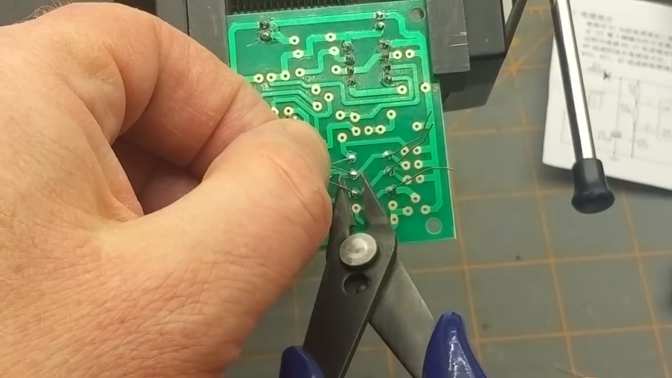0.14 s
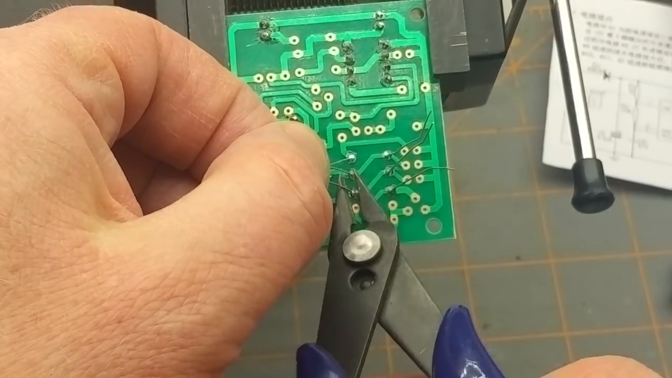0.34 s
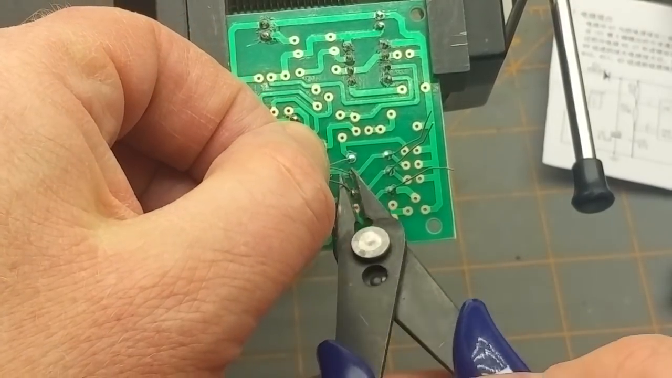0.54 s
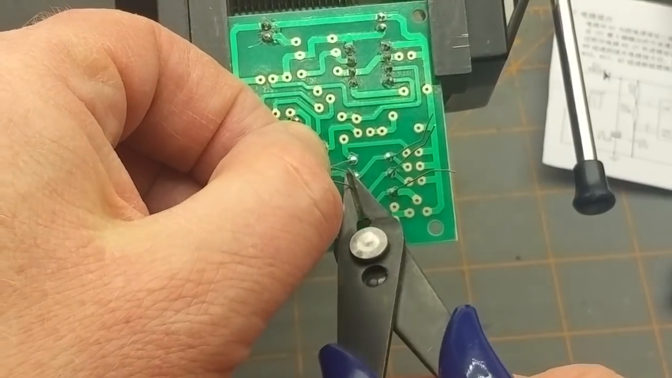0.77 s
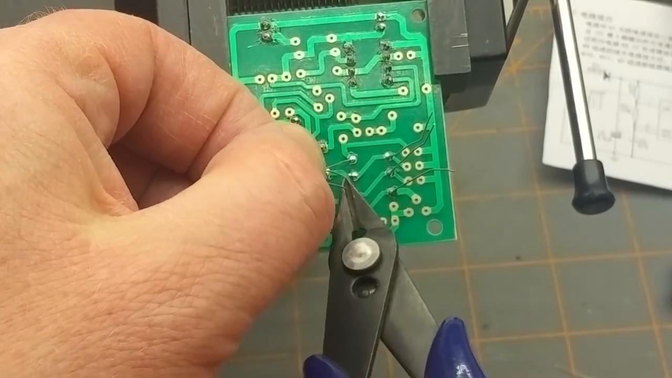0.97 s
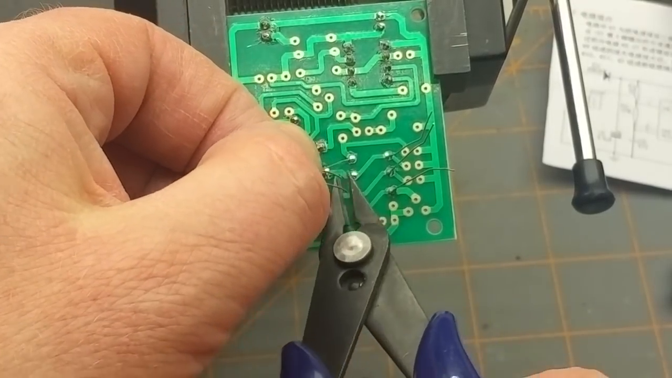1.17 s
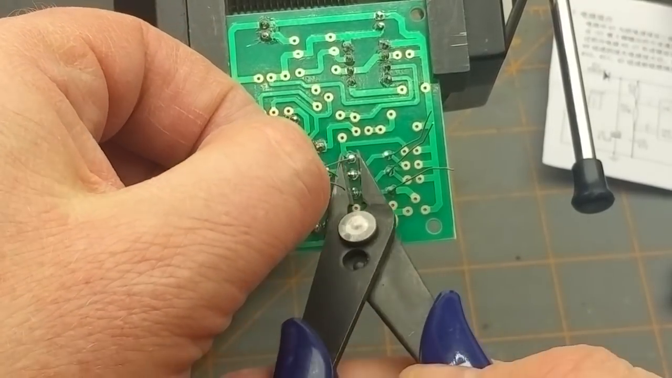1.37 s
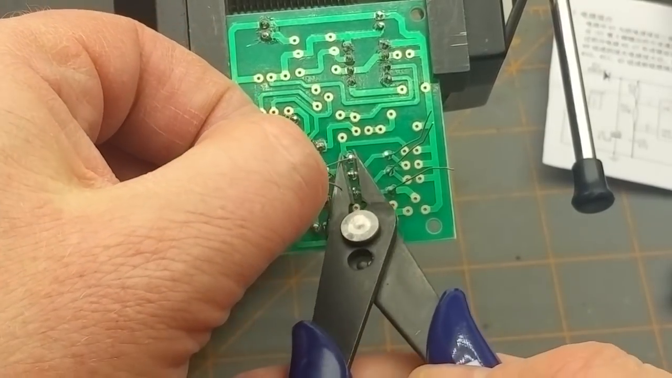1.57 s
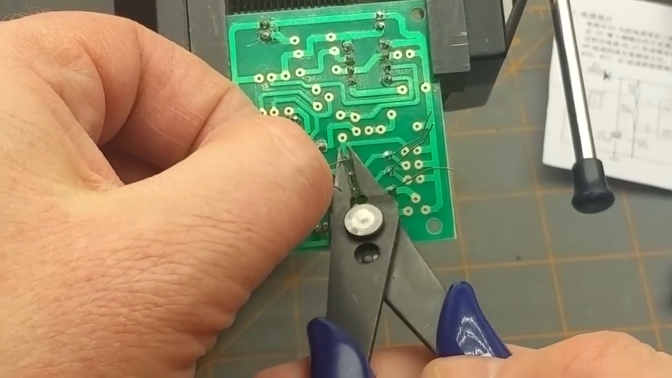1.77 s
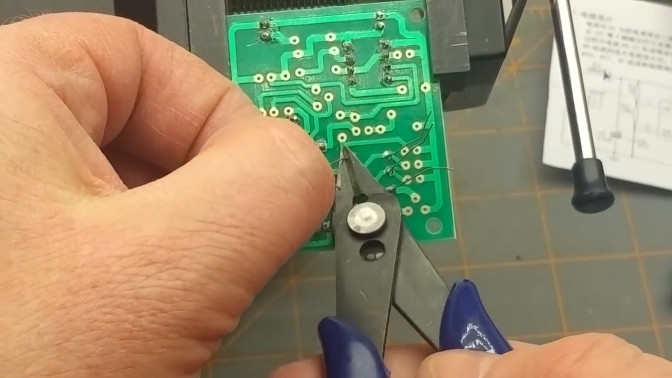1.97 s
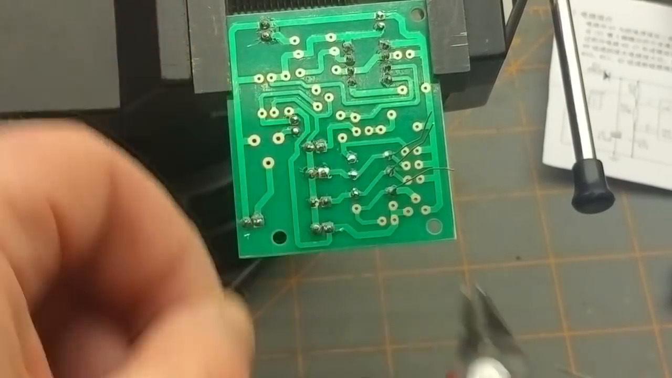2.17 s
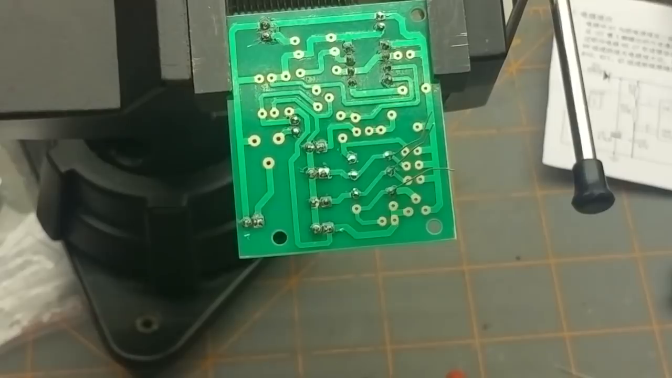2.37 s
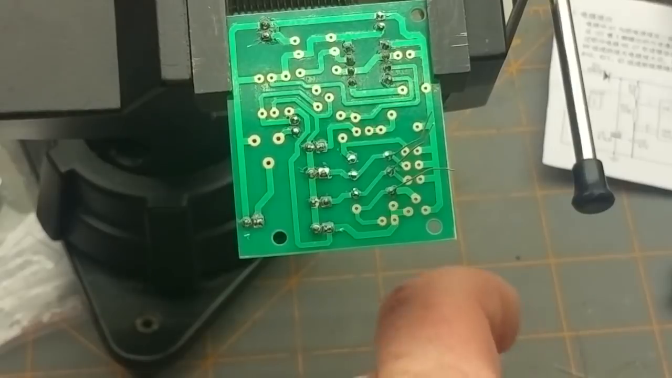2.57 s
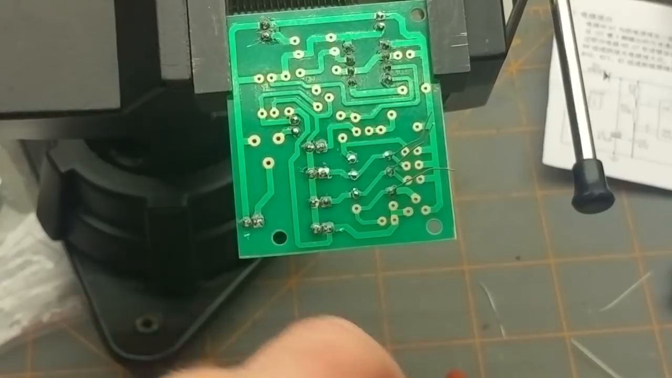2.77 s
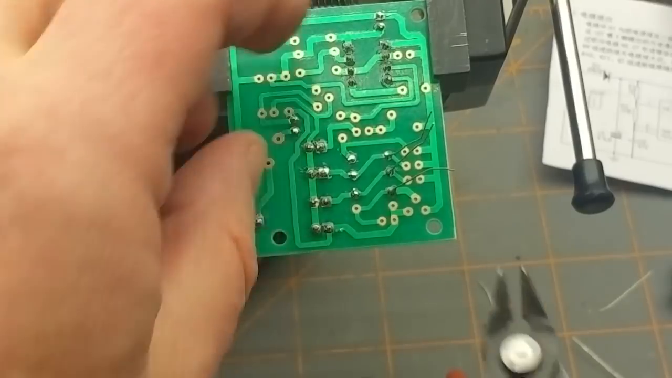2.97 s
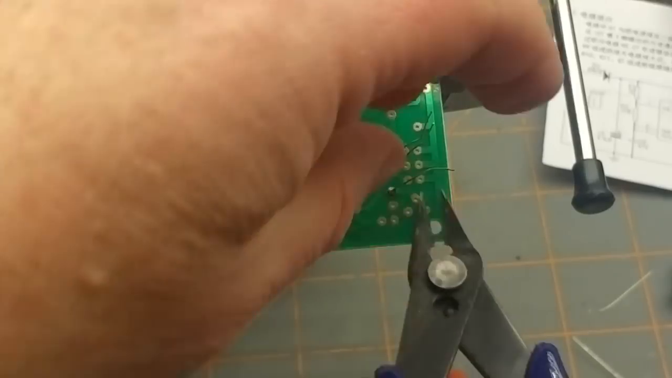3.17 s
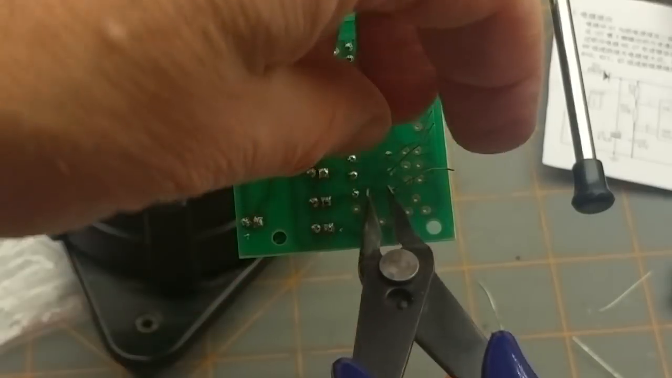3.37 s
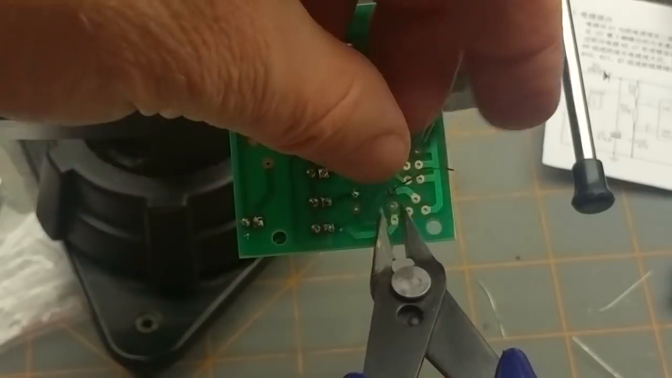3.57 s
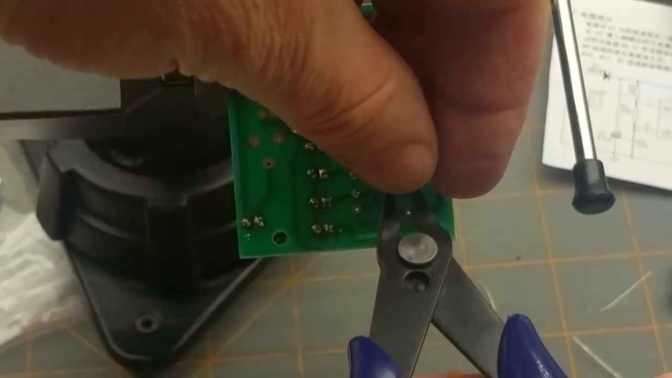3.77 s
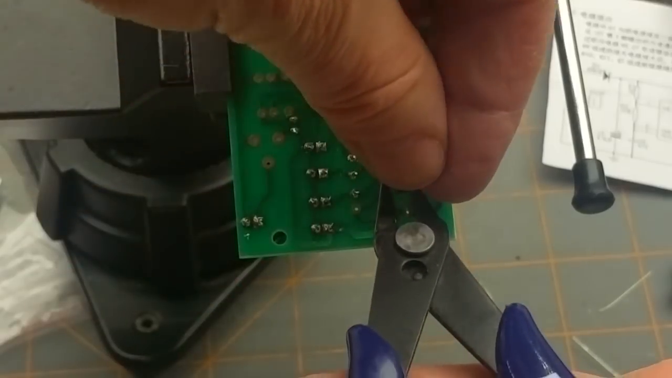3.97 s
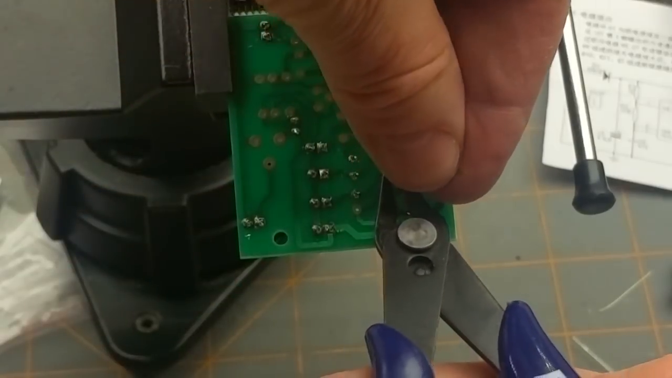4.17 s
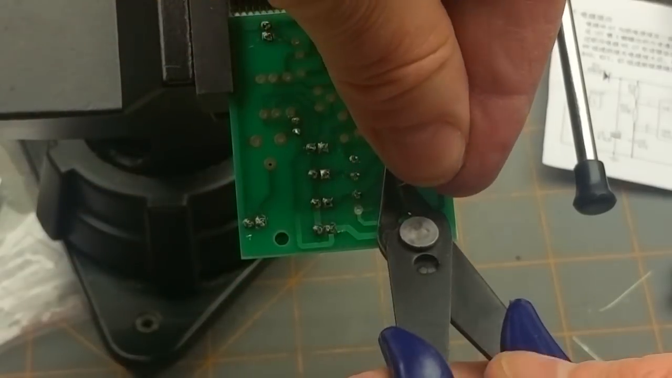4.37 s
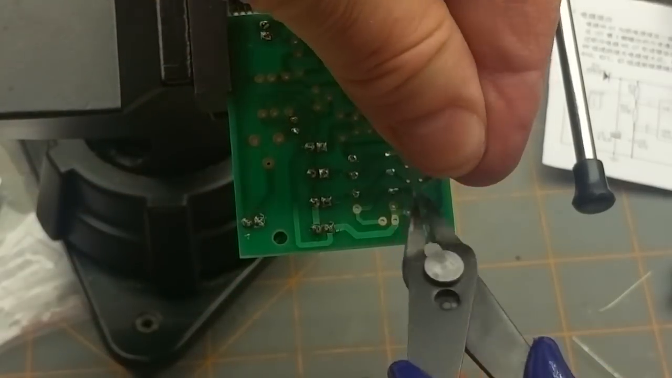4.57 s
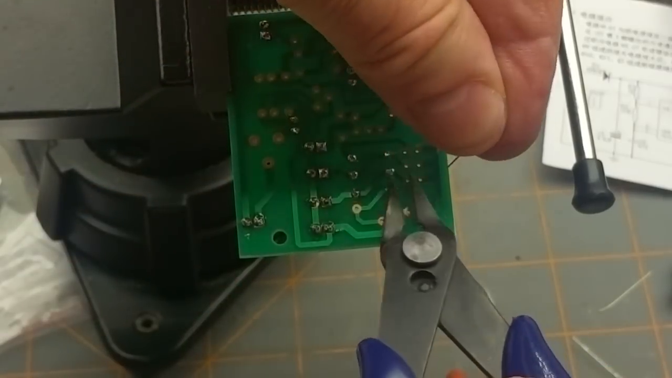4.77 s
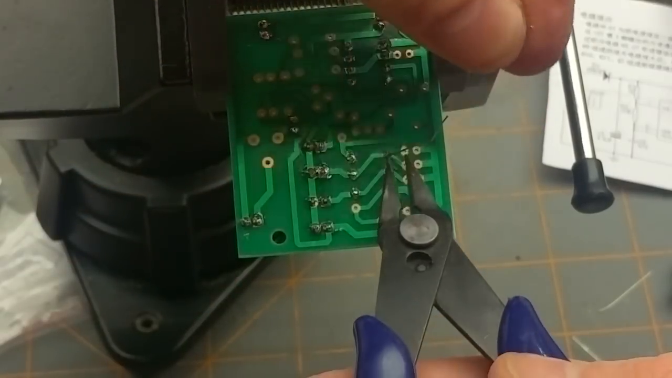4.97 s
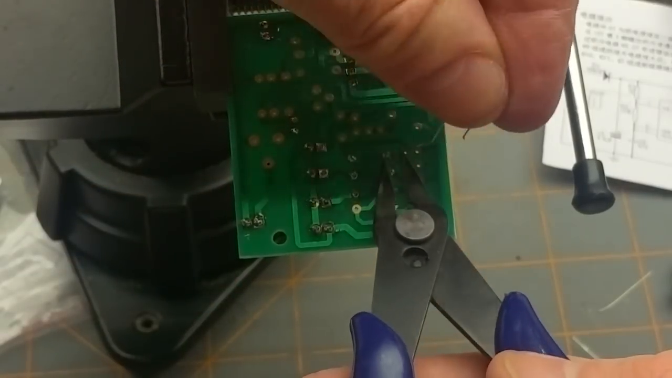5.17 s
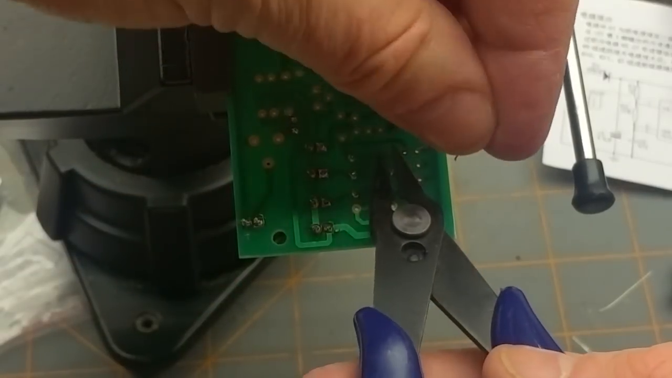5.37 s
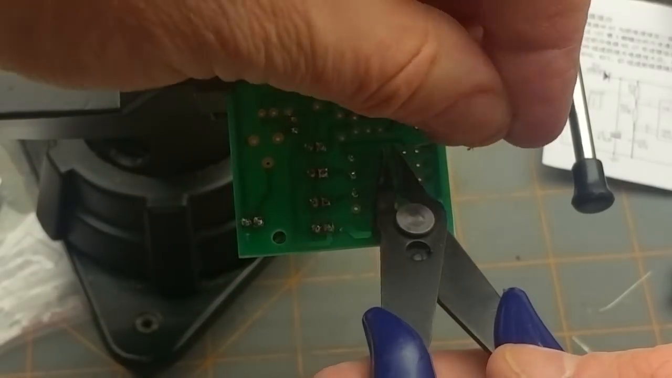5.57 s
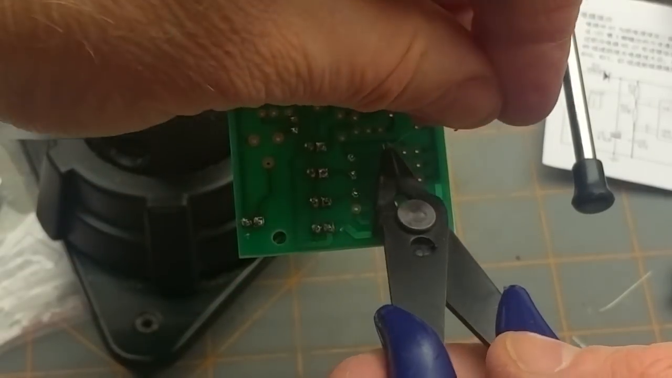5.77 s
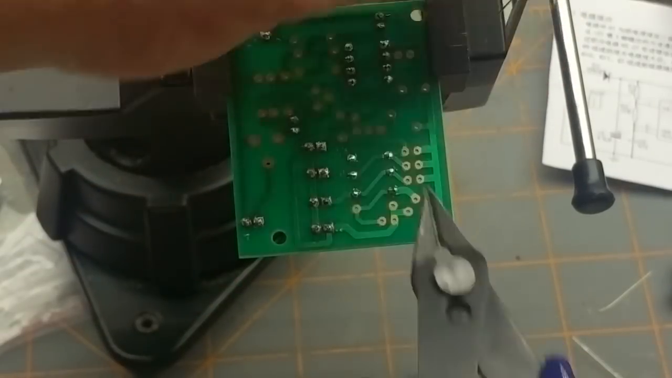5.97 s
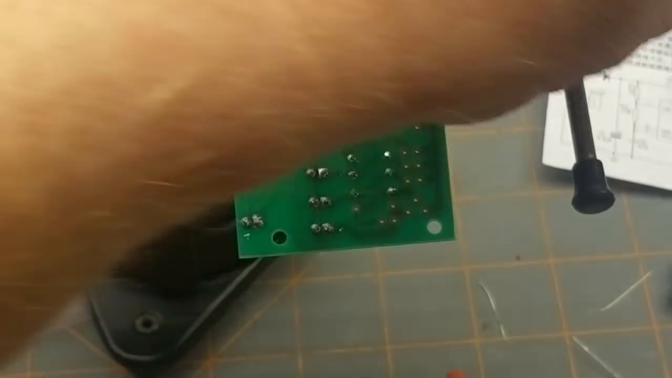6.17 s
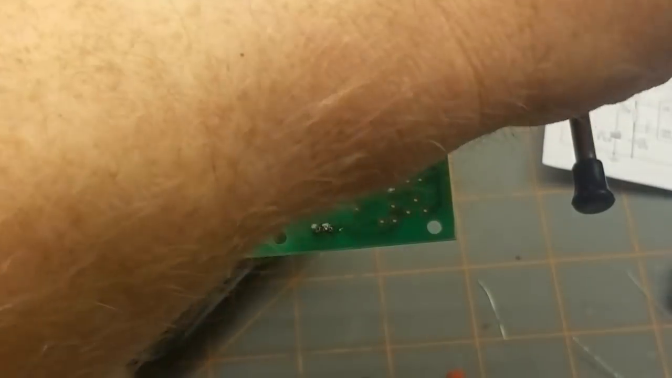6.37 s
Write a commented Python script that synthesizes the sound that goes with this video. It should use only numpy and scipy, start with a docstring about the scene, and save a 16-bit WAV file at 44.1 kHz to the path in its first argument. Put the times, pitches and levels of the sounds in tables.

```python
"""Flush cutters snip wire leads on a circuit board held in a bench vise, close to the microphone in a small room.
Each cut is a noise burst through the board's resonances, over decaying sines for the thump of vise and bench.
Between cuts the jaws tick (filtered bursts), nudge the board and squeak on the leads (wavering tone and grit);
with some cuts, and at times between them, the steel rings (decaying modes). Offcuts patter on the mat in shrinking
bounces. Behind lie hiss (shaped noise), hum (steady sines) and a faint falling drone like a distant engine."""
import sys
import numpy as np
from scipy import signal
from scipy.fft import rfft, irfft, next_fast_len
from scipy.io import wavfile
from scipy.ndimage import map_coordinates

SR = 44100
rng = np.random.default_rng(int(sys.argv[2]) if len(sys.argv) > 2 else 0)


def wav_record(signal):
    """Record a signal, one row per channel, as 16-bit PCM in the file named by sys.argv[1]."""
    frames = np.transpose(np.atleast_2d(signal))
    bounded = np.clip(frames, -1, 1)
    # unit amplitude maps onto the largest positive 16-bit level
    quanta = np.round(bounded * 32767).astype(np.int16)
    wavfile.write(sys.argv[1], SR, quanta)


N = 283637
SIZE = 16384  # samples in one short sound
AGE = np.arange(SIZE) / SR  # seconds since a short sound began
GRID = np.fft.rfftfreq(SIZE, 1 / SR)  # Hz
TIME = np.arange(N) / SR  # seconds into the scene
SOFT_THUMP_TILT_DB = 0  # per octave, for nudges and bumps


def amp(db):
    """Decibels to gain."""
    return 10 ** (np.asarray(db) / 20)


def unit(x):
    """Scale to rms 1."""
    return x / np.sqrt(np.mean(x ** 2) + 1e-20)


def along(points, hz):
    """Interpolate (Hz, value) points on a log frequency axis."""
    point_hz, values = np.transpose(points)
    return np.interp(np.log(hz + 1), np.log(point_hz + 1), values)


def fade(t, t60):
    """Free decay, 60 dB in t60 seconds."""
    return np.exp(-np.log(1000) * t / t60)


def wander(size, hz):
    """A smooth random curve of rms 1 that changes about hz times a second."""
    knots = rng.standard_normal(int(size * hz / SR) + 4)
    return unit(map_coordinates(knots, [np.arange(size) * hz / SR]))


def add(track, s, sound):
    """Mix a sound into the track at time s."""
    part = track[max(round(s * SR), 0):][:len(sound)]
    part += sound[:len(part)]


def filtered(x, gain):
    """Multiply the spectrum of x by a gain that is a function of frequency."""
    size = next_fast_len(N + SIZE)
    return irfft(rfft(x, size) * gain(np.fft.rfftfreq(size, 1 / SR)), size)[:N]


def coloured(x, gain):
    """Pass x through the minimum-phase filter with this gain on GRID, so nothing sounds before its cause."""
    # folding the cepstrum forward in time gives the minimum phase
    cepstrum = irfft(np.log(np.maximum(gain, 1e-6)))
    cepstrum[1:SIZE // 2] *= 2
    cepstrum[SIZE // 2 + 1:] = 0
    impulse_response = irfft(np.exp(rfft(cepstrum)))
    return signal.fftconvolve(x, impulse_response)[:SIZE]


def air_hiss():
    """Steady room air and microphone hiss: noise with a fixed spectrum."""
    # spectrum of the air and hiss: hz, relative_level_db (per Hz)
    air_points = [(20, -7), (65, 0), (125, 2.5), (170, -5.5), (450, -8), (700, -12.5), (1300, -12.5),
                  (2500, -18.5), (4000, -22.5), (5100, -14.5), (6000, -26.5), (7300, -25.5), (10500, -19.5),
                  (17000, -23)]
    noise = filtered(rng.standard_normal(N), lambda hz: amp(along(air_points, hz)))
    return amp(-66.35) * unit(noise)


def hum():
    """Mains and fan: steady sines, each at a random phase."""
    # hum tones: pitch_hz, level_db (rms)
    hum_tones = [(120, -79), (360, -84.5), (946, -83.5)]
    out = np.zeros(N)
    for hz, db in hum_tones:
        out += amp(db) * unit(np.sin(2 * np.pi * (hz * TIME + rng.random())))
    return out


def distant_engine():
    """A far engine runs down: its firing rate falls exponentially while its level flutters and dies away."""
    # level before the flutter: time_s, level_db (rms)
    level_points = [(0, -73.5), (.3, -62.5), (.7, -73), (1.35, -68), (1.52, -60.5), (2.1, -66), (2.33, -62),
                    (2.5, -71)]
    start_hz, slowing_s, fade_db_per_s = 121.4, 5.6, 14
    firing_hz = start_hz * np.exp(-TIME / slowing_s)
    phase = 2 * np.pi * np.cumsum(firing_hz) / SR + 0.17 * wander(N, hz=12)
    s, db = np.transpose(level_points)
    # the steady fade begins after the last point
    level_db = np.interp(TIME, s, db) - fade_db_per_s * np.maximum(TIME - s[-1], 0)
    flutter_db = 2.5 * wander(N, hz=10)
    return amp(level_db + flutter_db) * unit(np.sin(phase))


def blow(tear_t60, scatter_db, scatter_t60, room_db):
    """A sharp push and a moment of tearing, their quick scatter off tool and bench, and the room's tail."""
    # decay of the small room: hz, t60_s
    room_decay = [(150, 0.59), (700, 0.22), (2000, 0.13), (5000, 0.14), (15000, 0.12)]
    tear = rng.standard_normal(SIZE) * fade(AGE, tear_t60) * (1 - np.exp(-AGE / .0005))
    scatter = rng.standard_normal(SIZE) * fade(AGE, scatter_t60) * (1 - np.exp(-AGE / 0.0018))
    # each band of the tail dies at its own rate
    hz, t, bands = signal.stft(rng.standard_normal(SIZE), SR, nperseg=256)
    bands = bands * fade(t, along(room_decay, hz)[:, None])
    tail = signal.istft(bands, SR, nperseg=256)[1][:SIZE]
    tail *= 1 - np.exp(-AGE / .002)
    push = np.zeros(SIZE)
    for gain, part in [(1, tear), (amp(scatter_db), scatter), (amp(room_db), tail)]:
        push += gain * part / np.linalg.norm(part)
    push[0] += .35  # the sharp push itself
    return push / np.linalg.norm(push)


def taps(rows, spectrum, gain_db, scatter_db, scatter_t60, room_db):
    """Small contacts, too light to shake the bench: blows with the spectrum of what is touched."""
    out = np.zeros(N)
    for s, db, sizzle_db in rows:
        treble_db = along([(5500, 0), (9000, sizzle_db + 9.5)], GRID)
        colour = amp(along(spectrum, GRID) + treble_db)
        touch = coloured(blow(0.011, scatter_db, scatter_t60, room_db), colour)
        add(out, s + 0.0009, amp(db + gain_db) * touch)
    return out


def offcuts():
    """Snipped ends land on the mat: each touches three times, ever sooner and weaker."""
    # landings: start_s, level_db
    landings = [(2.7043, -39.5), (2.716, -44), (2.722, -42), (2.7382, -41.5), (2.7857, -47.5), (2.859, -49),
                (6.385, -32)]
    # spectrum of a touch on the mat: hz, relative_level_db
    mat_spectrum = [(200, -13), (800, -12), (1400, -3.5), (2200, -5), (3200, -2.5), (5400, 0), (7500, -13),
                    (11500, -9), (16000, -21)]
    first_flight_s, flight_shrink, loss_db, sizzle_db = 0.016, 0.55, 8, -10.5  # loss at each bounce
    rows = []
    for s, db in landings:
        for k in range(3):
            rows.append((s, db - loss_db * k, sizzle_db))
            s = s + first_flight_s * flight_shrink ** k
    return taps(rows, mat_spectrum, gain_db=19.0, scatter_db=3.0, scatter_t60=0.015, room_db=1.0)


def jaw_ticks():
    """Light touches of the steel jaws."""
    # ticks: start_s, level_db, sizzle_db (relative to the level)
    ticks = [(0.978, -51.5, -25), (1.0807, -48, -36), (1.293, -53.5, 1), (2.1708, -45, -24),
             (3.5964, -51, -14), (4.671, -44.5, -18), (6.0804, -44.5, -22)]
    # spectrum of a touch of the jaws: hz, relative_level_db
    jaw_spectrum = [(200, -20), (700, -2), (1300, 3), (3500, 2), (5200, 1.5), (7500, -12), (16000, -15)]
    return taps(ticks, jaw_spectrum, gain_db=16.0, scatter_db=-14, scatter_t60=0.016, room_db=-6.0)


def squeaks():
    """A jaw slips along a lead: steel sticks and slips on wire, a wavering squeal in a gritty scrape."""
    # slips: middle_s, length_s, squeal_hz, level_db, roughness (0-1, share of grit in the power)
    slides = [(0.996, 0.03, 1850, -66.5, 0.85), (1.397, 0.006, 852, -66, 0.3),
              (1.418, 0.0045, 660, -59, 0.3), (2.126, 0.021, 2620, -61.5, 0.55),
              (2.131, 0.025, 846, -58.5, 0.9), (2.136, 0.016, 1610, -53, 0.07),
              (3.891, 0.024, 1306, -71, 0.2), (3.934, 0.015, 1310, -69, 0.5)]
    middle = .1  # seconds into the short sound
    out = np.zeros(N)
    for s, length, squeal_hz, db, rough in slides:
        swell = np.exp(-np.pi * ((AGE - middle) / length) ** 2 / 2)
        tone = np.sin(2 * np.pi * squeal_hz * AGE + .5 * wander(SIZE, hz=323))
        slips = rng.standard_normal(SIZE) * amp(2.2 * wander(SIZE, hz=591))
        scrape_points = [(squeal_hz / 3, -12), (squeal_hz, 0), (squeal_hz * 2, -7), (squeal_hz * 5, -36)]
        grit = coloured(slips, amp(along(scrape_points, GRID)))
        mixture = np.sqrt(1 - rough) * unit(tone) + np.sqrt(rough) * unit(grit)
        add(out, s - middle, amp(db + 2) * swell * mixture)
    return out


def rings():
    """The cutters spring free: their steel rings briefly and unsteadily in the hand."""
    # rings: start_s, level_db, tilt_db_per_octave (towards the high modes)
    releases = [(0.82, -33.5, 1), (3.597, -51.5, 0.5), (4.936, -63, 0), (5.849, -40.5, -3)]
    # modes of the steel: pitch_hz, relative_level_db, t60_s
    steel_modes = [(2630, -19.5, 0.1), (3180, -7, 0.16), (3120, -18, 0.13), (4300, -19, 0.13),
                   (8050, -8, 0.073), (16200, -7, .1)]
    out = np.zeros(N)
    for s, db, tilt_db in releases:
        for hz, mode_db, t60 in steel_modes:
            phase = 2 * np.pi * hz * AGE + hz / 5000 * wander(SIZE, hz=260)
            bright_db = tilt_db * np.log2(hz / steel_modes[0][0])
            level_db = db + mode_db + bright_db + rng.normal(0, 2)
            add(out, s, amp(level_db) * np.sin(phase) * fade(AGE, t60))
    return out


def thump(tilt_db):
    """The vise rocks and the bench swells after it, a little differently under each grip."""
    # modes of vise and bench, before the grip varies them: pitch_hz, relative_level_db, t60_s, swell_s
    bench_modes = [(107.2, -2.5, 0.17, 0.057), (120, 2.5, 0.13, 0.014), (209.5, -5.5, 0.11, 0.013),
                   (227.4, -8.5, 0.11, 0.017), (287, -20.5, .16, 0.0034), (391.6, -28, 0.18, 0.0021),
                   (481.3, -10.5, 0.048, 0.0068)]
    out = np.zeros(SIZE)
    for hz, db, t60, swell in bench_modes:
        level, detune, phase = rng.standard_normal(3)
        sway = -np.sin(2 * np.pi * hz * (1 + .015 * detune) * AGE + phase * hz / 400)
        shape = fade(AGE, t60) * (1 - np.exp(-(AGE / swell) ** 2))
        bright_db = tilt_db * np.log2(hz / bench_modes[0][0])
        out += amp(db + level + bright_db) * sway * shape
    return out


def strikes(rows):
    """Blows on the board, coloured by its resonances and the sharpness of contact, with a thump of the vise."""
    # modes of the clamped board: centre_hz, width_hz, relative_level_db
    board_modes = [(180, 240, 1.5), (462, 136, 3), (920, 102, 2), (1307, 133, 7), (1790, 520, 4.5),
                   (2390, 580, -9), (2724, 410, 0.5), (3730, 2200, 2.5), (4980, 1100, -3.5),
                   (7950, 6600, -3.5), (11500, 2900, -0.5), (15300, 4000, -9)]
    board = amp(-38.0)  # a little passes at every frequency
    for hz, width, db in board_modes:
        resonance = GRID * width / (hz ** 2 - GRID ** 2 + 1j * GRID * width)
        board = board + amp(db) * np.abs(resonance) ** 2
    out = np.zeros(N)
    for s, db, thump_db, crack_db, sizzle_db, note_hz, tilt_db in rows:
        knock_db = -2.5 - 0.49 * crack_db  # the duller the contact, the more it bends the board
        sharpness_points = [(600, knock_db), (1500, 0.0054), (4200, crack_db + 0.5),
                            (8000, sizzle_db + 2), (17000, sizzle_db + 1)]
        sharpness_db = along(sharpness_points, GRID)
        # each spot on the board favours its own modes
        place_db = 3 * np.exp(-(np.log2((GRID + 1) / note_hz) / 0.39) ** 2)
        # a dull contact lasts longer than a clean break
        push = blow(tear_t60=.006 * amp(-crack_db / 4), scatter_db=-3, scatter_t60=.035, room_db=-10.5)
        knock = coloured(push, board * amp(sharpness_db + place_db))
        add(out, s + .001, amp(db + 23.5) * knock)
        add(out, s + 0.00084, amp(db + thump_db + 7.5) * thump(tilt_db))
    return out


def bumps():
    """The hand leans on the board: a thump of the vise with only a faint, low knock, as flesh is soft."""
    # soft pushes: start_s, thump_level_db
    pushes = [(1.299, -53.5), (1.37, -47.5), (1.73, -55), (3.557, -56), (3.597, -58), (3.81, -52),
              (5.153, -54), (5.185, -46)]
    knock_db, crack_db, sizzle_db, note_hz = -10.5, -15, -15, 800  # knock relative to the thump
    rows = []
    for s, db in pushes:
        rows.append((s, db + knock_db, -knock_db, crack_db, sizzle_db, note_hz, SOFT_THUMP_TILT_DB))
    return strikes(rows)


def nudges():
    """A gentle nudge mostly rocks the vise; a harder one knocks, and wakes higher notes of the board."""
    # jaws seek a lead or let go: start_s, level_db, crack_db (relative to the level)
    contacts = [(0.705, -54.5, -10), (0.907, -33, -8.5), (1.151, -47.5, -13), (1.836, -54.5, -17),
                (2.143, -50, -15), (3.757, -50, -28), (3.867, -57.5, -10), (3.922, -57, -37),
                (4.268, -54, -17), (4.579, -54, -19), (5.05, -38.5, -22), (5.429, -52, -26),
                (5.458, -42.5, -18), (5.684, -49.5, -17), (5.95, -57.5, -27)]
    # a typical nudge
    typical_db, typical_note_hz, typical_thump_db, sizzle_db = -53.5, 1400, 1, -27.5
    thump_lag = 0.28  # dB that the thump falls behind per dB of force
    note_db_per_octave = 30  # extra force that lifts the note an octave
    rows = []
    for s, db, crack_db in contacts:
        force_db = db - typical_db
        note_hz = typical_note_hz * 2 ** (force_db / note_db_per_octave)
        thump_db = typical_thump_db - thump_lag * force_db
        rows.append((s, db, thump_db, crack_db, sizzle_db, note_hz, SOFT_THUMP_TILT_DB))
    return strikes(rows)


def cuts():
    """A lead parts under the jaws: the sudden release cracks through the board and thumps the vise."""
    # cuts: start_s, level_db, then thump_db, crack_db, sizzle_db (all relative to the level),
    # note_hz (most favoured on the board), thump_tilt_db_per_octave
    parting_leads = [(0.82, -21, -12, -2, -6, 2950, -0.5), (1.983, -28.5, -7, -13, -25, 1070, 0.5),
                     (4.45, -25.5, -2.5, -6, -19, 1020, -6), (5.847, -21.5, -12.5, 2, -1, 1410, 2)]
    return strikes(parting_leads)


def scene():
    """Everything on the bench, heard by one microphone."""
    behind = air_hiss() + hum() + distant_engine()
    tools = offcuts() + jaw_ticks() + squeaks() + rings()
    board = bumps() + nudges() + cuts()
    return (behind + tools + board)[None]


def record(dry):
    """The recorder keeps nothing above its band limit."""
    top_hz = 17300
    return filtered(dry[0], lambda hz: hz < top_hz)[None]


dry = scene()
out = record(dry)
wav_record(out)
```